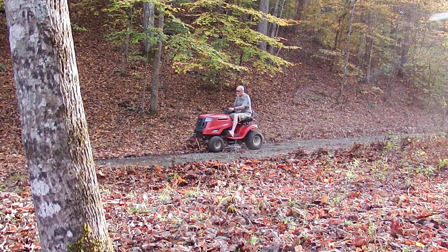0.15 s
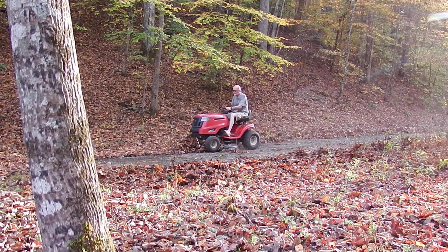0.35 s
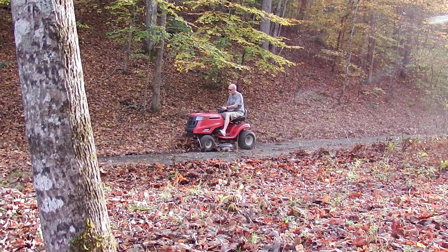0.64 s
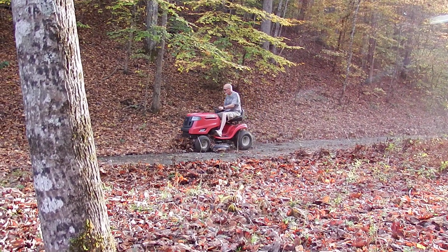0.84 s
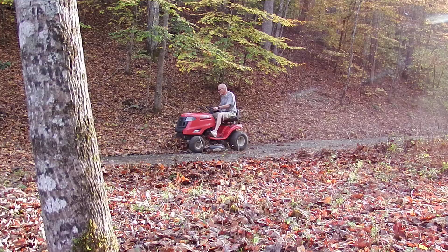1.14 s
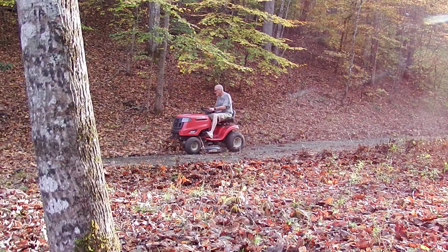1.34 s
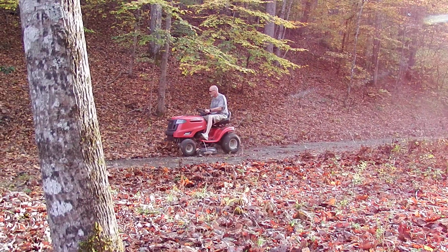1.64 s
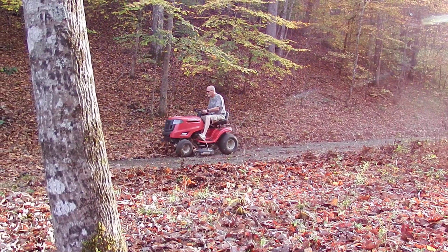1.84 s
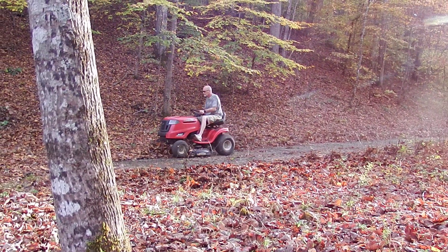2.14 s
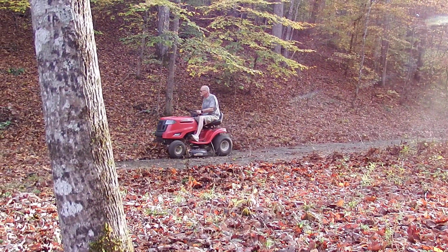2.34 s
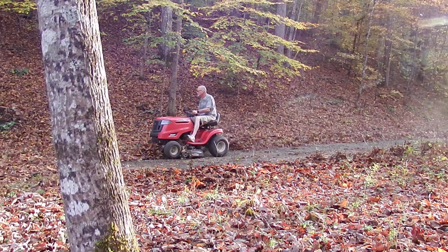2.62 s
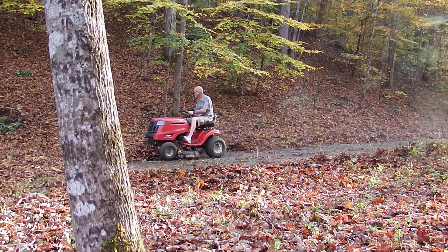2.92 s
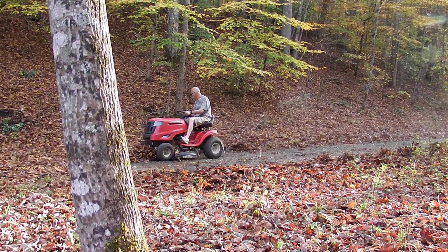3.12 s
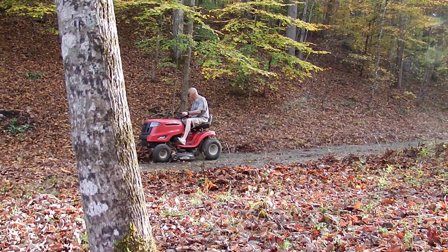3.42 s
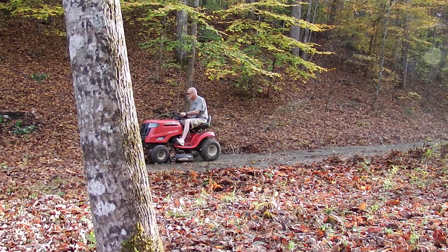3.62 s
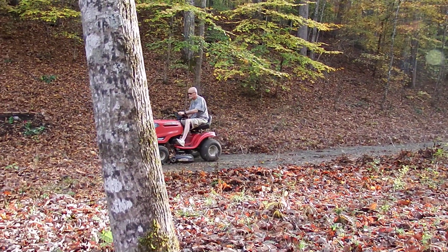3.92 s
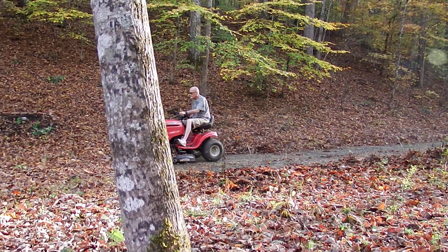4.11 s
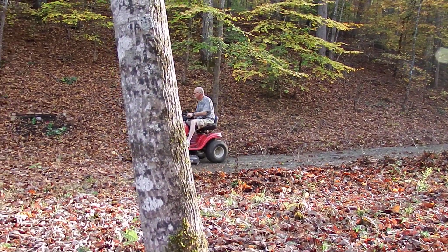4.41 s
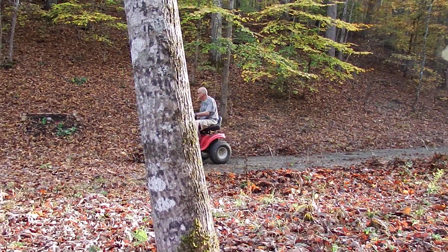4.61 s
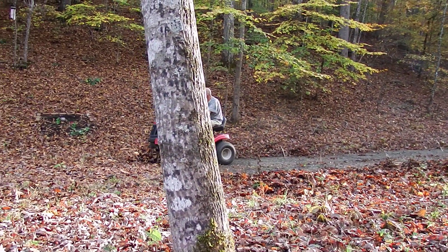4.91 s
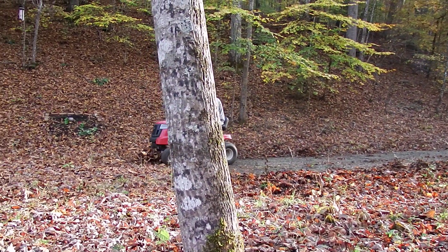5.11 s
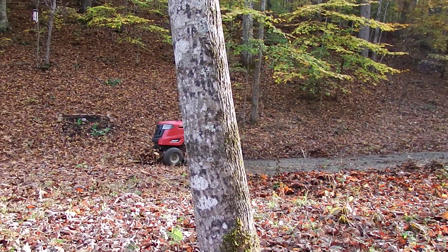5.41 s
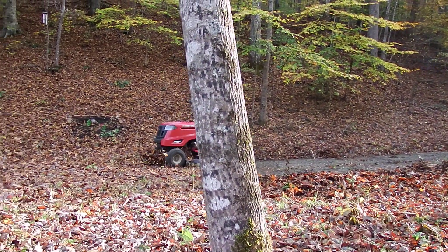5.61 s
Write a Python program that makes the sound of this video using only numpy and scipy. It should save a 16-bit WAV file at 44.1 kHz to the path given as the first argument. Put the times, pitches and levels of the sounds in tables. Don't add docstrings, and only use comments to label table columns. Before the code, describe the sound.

Continuous mower noise outdoors among trees: a droning engine recovering from load, slowly throbbing blades, a breathy whine and a dense rush of air and chopped leaves. Sharp twig cracks scatter throughout, busiest around 1.3, 3.4 and 3.9 seconds. The sound grows somewhat nearer in the later half, with fewer leaves near the end. Heard on a small camera whose automatic gain dips after loud cracks, with little deep bass.

```python
import sys
import numpy as np
from scipy import signal
from scipy.fft import rfft, irfft
from scipy.io import wavfile
from scipy.ndimage import uniform_filter1d, minimum_filter1d

SR = 44100
rng = np.random.default_rng(int(sys.argv[2]) if len(sys.argv) > 2 else 0)


def int16_out(signal):
    q = np.round(np.clip(np.atleast_2d(signal).T, -1, 1) * 32767)
    wavfile.write(sys.argv[1], SR, q.astype(np.int16))


def amplitude_ratio(level_db):
    exponent = np.asarray(level_db, float) / 20
    return 10 ** exponent


N = 253571
T = np.arange(N) / SR

# (time [s], nearness [dB], leaf load [dB], flank turned to the microphone [0-1])
MOWER = [(0, -4, 0, 0.05), (.5, -1.5, 0.5, 0.4), (.9, -0.5, 3.5, 0.4), (1.3, -1, 1, 0.15), (1.6, -3, 3, 0),
         (1.9, -2.5, -4, 0), (2.3, -1.5, -1.5, 0.26), (2.7, -0.5, 1, .3), (2.95, 0, 3.5, 0.4),
         (3.3, -0.5, 1.5, 0.1), (3.8, 2.5, 3, .5), (4.27, 1, 0.5, 0.16), (4.42, 3.5, -.5, 1),
         (4.8, 1.5, -2.5, 0.5), (5.15, 2.5, -4.5, 1), (5.45, 0, -2.5, 0.3), (5.75, 1.5, -4.5, 0.1)]
# (frequency [Hz], level [dB])
RUSH_SPECTRUM = [(300, -76), (800, -50.5), (1100, -3.5), (1250, -4.5), (1630, -4.5), (1920, -4), (2230, -1),
                 (3030, -5.5), (3700, -5), (4110, -6.5), (4970, -20.5), (5700, -36), (6500, -45),
                 (11000, -100)]
# (frequency [Hz], level [dB])
CRISP_SPECTRUM = [(1500, -77), (3500, -50), (5500, -6.5), (6400, -11), (7500, -4), (8600, 0), (9500, -6),
                  (10200, -12), (11500, -14), (13500, -22), (15700, -35), (18000, -37)]


def evened(x):
    return x / np.sqrt(np.mean(x ** 2) + 1e-20)


def curve(rows, t=T):
    s, *columns = np.transpose(rows)
    return [np.interp(t, s, c) for c in columns]


def read(points, hz):
    f, *columns = np.transpose(points)
    return [np.interp(np.log(hz + 1), np.log(f + 1), c) for c in columns]


def colour(x, points):
    level_db = read(points, abs(np.fft.fftfreq(8192, 1 / SR)))[0]
    log_gain = level_db * np.log(10) / 20
    response = np.exp(np.conj(signal.hilbert(log_gain)))
    taps = np.fft.ifft(response).real[:4096] * np.hanning(8192)[4096:]
    return signal.oaconvolve(x, taps / np.linalg.norm(taps))[:N]


def wander(per_s):
    b, a = signal.butter(2, min(per_s / SR * 2, .9))
    return evened(signal.lfilter(b, a, rng.standard_normal(N + SR))[SR:])


def shaft_turns(since=3.02):
    # (time [s], firing rate [1/s])
    firing_rate = [(0, 22), (.25, 22.85), (.5, 23.8), (.75, 24.9), (1, 25.35), (1.25, 25.6), (1.6, 25.45),
                   (2, 25.95), (2.5, 26.1), (3.75, 25.97), (4.15, 25.75), (4.5, 25.95), (4.75, 25.8),
                   (5, 25.94), (5.75, 26.1)]
    turns = np.cumsum(curve(firing_rate)[0]) / SR
    return turns - np.interp(since, T, turns)


def engine():
    # (order [multiple of firing rate], level [dB])
    exhaust_orders = [(2, -16), (3, -25), (5, -0.5), (6, 0), (7, -7), (9, -5), (10, -10), (12, 3.5),
                      (14, 6.5), (16, -5), (18, 5.5)]
    near_db, _, flank = curve(MOWER)
    turns = shaft_turns()
    exhaust = amplitude_ratio(-54.5) * np.cos(2 * np.pi * 4 * turns)
    for order, db in exhaust_orders:
        level_db = db + (-50.5 if order < 6 else -50)
        if order > 6:
            level_db = level_db + 2.5 * wander(per_s=4)
        exhaust = exhaust + amplitude_ratio(level_db) * np.cos(2 * np.pi * (order * turns + rng.random()))
    return np.sqrt(2) * amplitude_ratio(1.65 * near_db - 7 * flank) * exhaust


def blades():
    # (first blade [dB], second blade [dB], time the two cancel [s], gain per nearness [dB/dB])
    blade_tones = [
        (-47, -53, 3.8, 2.5),
        (-44.5, -50.5, 4.72, 2),
        (-39, -53.5, 3.7, 0.8),
        (-49, -42.5, 4.92, 2.6),
        (-48, -46, 4.1, 1.9),
        (-46, -50, 4.0, 2.2),
    ]
    passes_per_firing, second_slower = 3.8775, .018
    near_db, _, flank = curve(MOWER)
    belt_wobble = .016 * wander(per_s=10)
    first = passes_per_firing * shaft_turns() + belt_wobble
    out = 0
    for k, (first_db, second_db, cancel_s, per_near) in enumerate(blade_tones):
        turns = (k + 1) * first + k * rng.random()
        behind = (k + 1) * second_slower * shaft_turns(cancel_s)
        pair = amplitude_ratio(first_db) * np.cos(2 * np.pi * turns)
        pair = pair - amplitude_ratio(second_db) * np.cos(2 * np.pi * (turns - behind))
        level_db = per_near * near_db + k * .3 * wander(per_s=9)
        if k == 0:
            level_db = level_db - 7 * flank
        out = out + np.sqrt(2) * amplitude_ratio(level_db) * pair
    return out


def fan():
    turns_per_firing = 23.6
    near_db, _, flank = curve(MOWER)
    fuzz = 1 + .7 * (wander(per_s=16) + 1j * wander(per_s=16))
    whine = evened((fuzz * np.exp(2j * np.pi * turns_per_firing * shaft_turns())).real)
    return amplitude_ratio(-33 + 2.74 * near_db - 3.5 * flank) * whine


def patchy(x, patchy_db, lasting_db):
    z = signal.stft(x, nperseg=512)[2]
    a, b = rng.standard_normal((2,) + z.shape)
    brief = uniform_filter1d(uniform_filter1d(a, size=5, axis=0), size=10, axis=1)
    lasting = uniform_filter1d(uniform_filter1d(b, size=2, axis=0), size=70, axis=1)
    gain_db = patchy_db * evened(brief) + lasting_db * evened(lasting)
    return signal.istft(z * amplitude_ratio(gain_db), nperseg=512)[1][:N]


def chips(per_s, spread_db):
    size_db = spread_db * np.minimum(rng.exponential(1, N), 5)
    size = amplitude_ratio(size_db) * rng.standard_normal(N)
    return evened(size * (rng.random(N) < per_s / SR))


def sliding_peaks(x):
    # (time [s], first [Hz], second [Hz], third [Hz], fourth [Hz])
    peak_paths = [(0, 1937, 2337, 3695, 4070), (1.1, 1937, 2463, 3460, 4060), (2.4, 1877, 2377, 3710, 3794),
                  (3.5, 1914, 2360, 3595, 3960), (4.8, 1875, 2120, 3880, 3420),
                  (5.75, 2077, 2310, 3835, 3460)]
    # (width [Hz], lift [dB])
    peak_shapes = [(60, 4.), (130, 3.), (90, 5.), (60, 3.5)]
    hz, t, z = signal.stft(x, SR, nperseg=1024)
    lift_db = 0
    for centre, (width, db) in zip(curve(peak_paths, t), peak_shapes):
        lift_db = lift_db + db * np.exp(-.5 * ((hz[:, None] - centre) / width) ** 2)
    return signal.istft(z * amplitude_ratio(lift_db), nperseg=1024)[1][:N]


def deck():
    # (frequency [Hz], level [dB])
    drone_spectrum = [(30, -61.5), (70, -47.5), (120, -34.5), (170, -18), (240, -3.5), (290, -5.5),
                      (450, -0.5), (650, -2.5), (800, -2.5), (1000, -0.5), (1300, -1), (1800, -50),
                      (3500, -80.5)]
    # (middle time [s], half length [s], swell [dB])
    heaps = [
        (0.284, 0.029, 1.5),
        (1.656, 0.07, 1),
        (3.482, 0.014, 1),
        (3.911, 0.017, 0.5),
        (4.416, .04, 0),
        (4.668, 0.0063, 2),
        (5.69, 0.028, 0.5),
    ]
    near_db, load_db, flank = curve(MOWER)
    heap_db = sum(db * np.exp(-.5 * ((T - s) / half) ** 2) for s, half, db in heaps)
    rush_db = -19.5 + 0.32 * near_db + 0.17 * load_db + 4.5 * flank + heap_db
    top_db = -23 + 0.12 * near_db + 0.22 * load_db - 3.5 * flank + 2.1 * heap_db

    drone = evened(patchy(colour(rng.standard_normal(N), drone_spectrum), patchy_db=-0.07, lasting_db=1.65))
    gust = amplitude_ratio(0.65 * wander(per_s=22))
    leaves = gust * chips(per_s=2900, spread_db=-1.0)
    rushing = colour(gust * rng.standard_normal(N), RUSH_SPECTRUM)
    air = sliding_peaks(patchy(rushing, patchy_db=1.23, lasting_db=2.07))
    chopped = sliding_peaks(colour(leaves, RUSH_SPECTRUM))

    high = signal.butter(3, 2950, "high", fs=SR, output="sos")
    air_top, chopped_top = signal.sosfiltfilt(high, [air, chopped])
    lower = evened(air - air_top + 0.25 * (chopped - chopped_top))
    upper = evened(air_top + .6 * chopped_top)
    shred = evened(colour(1.3 * gust * rng.standard_normal(N) + leaves, CRISP_SPECTRUM))

    out = drone * amplitude_ratio(-27.5 + 0.98 * near_db)
    out = out + lower * amplitude_ratio(rush_db) + upper * amplitude_ratio(top_db)
    return out + shred * amplitude_ratio(-46 + load_db)


def small_cracks():
    share, size = rng.random((150, 2)).T
    passed = np.cumsum(amplitude_ratio(2 * curve(MOWER)[1]))
    times = np.interp(share, passed / passed[-1], T)
    body_db = 13
    return [(s, -37.5 + 8 * k ** 2, body_db) for s, k in zip(times, size)]


def cracks():
    # (time [s], treble peak [dB], body against treble [dB])
    twig_hits = [(.2982, -31, 16), (.3162, -23, 19.5), (.4339, -24.5, 16.5), (.9906, -30, 15),
                 (1.0909, -28.5, 16), (1.1598, -32.5, 17), (1.257, -28.5, 20.5), (1.291, -25.5, 17.5),
                 (1.3164, -27.5, 19), (1.3463, -23, 11.5), (1.4217, -31, 23.5), (1.508, -30, 19),
                 (1.6257, -21.5, 23), (1.702, -25.5, 17), (1.9629, -29, 7), (2.8025, -29.5, 18.5),
                 (3.2774, -26.5, 11), (3.3179, -27.5, 7), (3.4491, -27, 19), (3.4755, -23, 18),
                 (3.8801, -23, 6), (3.9345, -22, 16), (4.0597, -25, 5), (4.2497, -29, 15.5),
                 (4.371, -29.5, 21), (5.1811, -28, 15), (5.2654, -28, 19.5), (5.4789, -25, 16),
                 (5.6685, -36, 26), (5.6945, -29, 22)]
    t60_s, rise_s = .05, 0.0013
    rows = twig_hits + small_cracks()
    treble, body, t = np.zeros(N), np.zeros(N), np.arange(4000) / SR
    noise = rng.standard_normal((len(rows), len(t)))
    for (s, db, body_db), burst in zip(rows, noise):
        burst = burst * amplitude_ratio(db - 5.0 - 60 * t / t60_s) * np.minimum(t / rise_s, 1)
        burst[:120] += 1.9 * np.diff(burst[:121]) * np.linspace(1, 0, 120)
        at = round(s * SR)
        treble[at:at + len(t)] += burst[:N - at]
        body[at:at + len(t)] += burst[:N - at] * amplitude_ratio(body_db + 2.5)
    bright_body = np.diff(body, prepend=0) * 2.5
    return colour(treble, CRISP_SPECTRUM) + colour(bright_body, RUSH_SPECTRUM)


def ports(x):
    # (frequency [Hz], in-phase share [ratio], quarter-turn share [ratio], unrelated part [dB])
    port_difference = [(86, 0.11, 0.064, -35), (800, 0.016, 0, -35), (1480, 0, 0, -23.5),
                       (1970, -0.011, -0.055, -21.5), (2700, 0.075, -.06, -25), (3120, -.1, -0.055, -7),
                       (4050, -0.11, .01, -32.5), (4980, 0.16, -0.064, -17), (5800, -.5, -.25, 11.5),
                       (7000, -.1, .22, 3), (7700, .05, -.02, -12), (9100, -.05, -.15, -10),
                       (9900, -.29, 0, 0), (10400, 0, 0.17, -5), (12500, 0.057, 0, -10)]
    z = signal.stft(x, nperseg=256)[2]
    random_phase = np.exp(2j * np.pi * rng.random(z.shape))
    scattered = signal.istft(z * random_phase, nperseg=256)[1][:N]
    along, across, apart_db = read(port_difference, np.fft.rfftfreq(N, 1 / SR))
    side = irfft((along + 1j * across) * rfft(x) + amplitude_ratio(apart_db - 2.5) * rfft(scattered), N)
    return np.array([x + side, x - side])


def scene():
    low_cut = signal.butter(4, 120, "high", fs=SR, output="sos")
    tones = signal.sosfilt(low_cut, engine() + blades())
    return ports(tones + fan() + deck() + cracks())


def top_cut(x):
    return signal.sosfilt(signal.butter(12, 15780, fs=SR, output="sos"), x)


def record(dry):
    # (time [s], depth [dB])
    gain_dips = [
        (-.1, 5),
        (.325, 2.5),
        (1.653, 12.5),
        (3.499, 5.5),
        (3.959, 1),
    ]
    # (frequency [Hz], width [Hz])
    motor_notches = [(222, 44), (1100, 273)]
    fall_s, recover_s = 0.045, 0.3
    for s, depth_db in gain_dips:
        since = np.maximum(T - s, 0)
        dip = (1 - np.exp(-since / fall_s)) * np.exp(-since / recover_s)
        dry = dry * amplitude_ratio(-depth_db * dip)
    for hz, width in motor_notches:
        b, a = signal.iirnotch(hz, hz / width, SR)
        dry = signal.lfilter(b, a, dry)
    limit = np.minimum(.76 / (abs(dry).max(axis=0) + 1e-9), 1)
    mix = dry * uniform_filter1d(minimum_filter1d(limit, size=181), size=181)
    return top_cut(mix)


dry = scene()
out = record(dry)
int16_out(out)
```